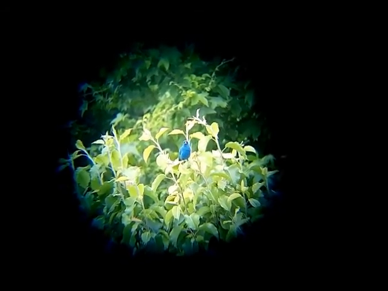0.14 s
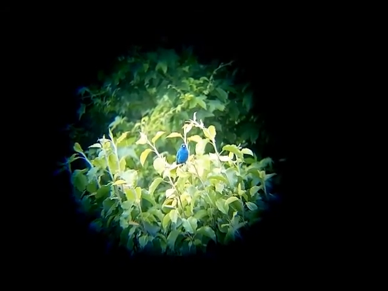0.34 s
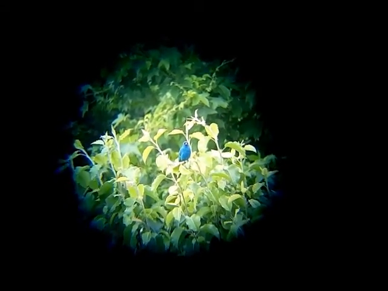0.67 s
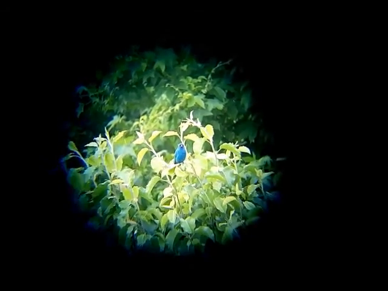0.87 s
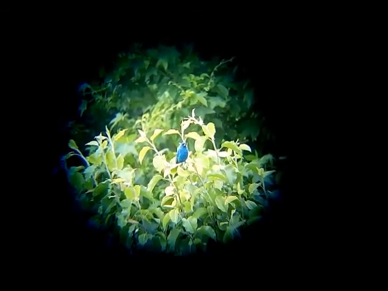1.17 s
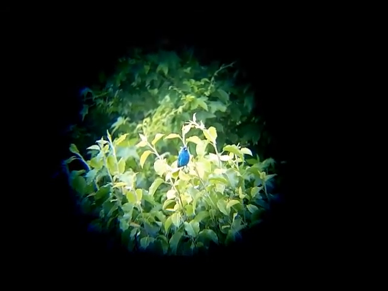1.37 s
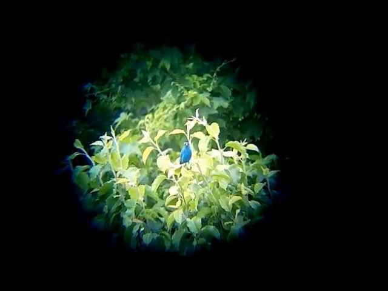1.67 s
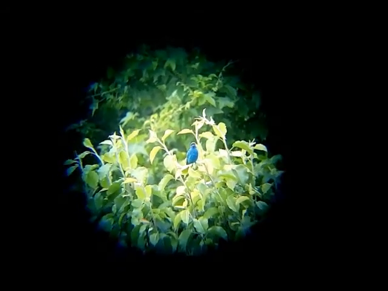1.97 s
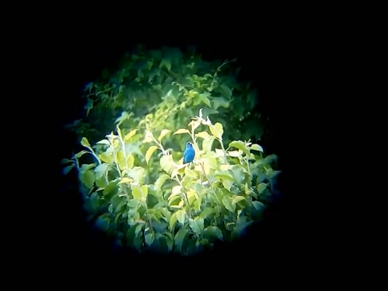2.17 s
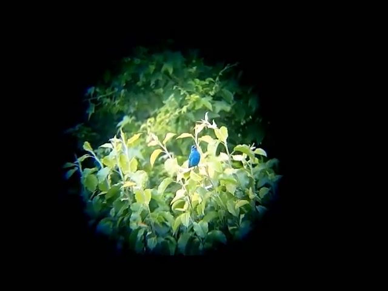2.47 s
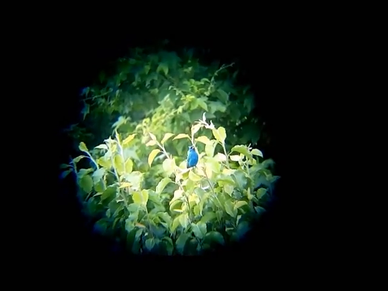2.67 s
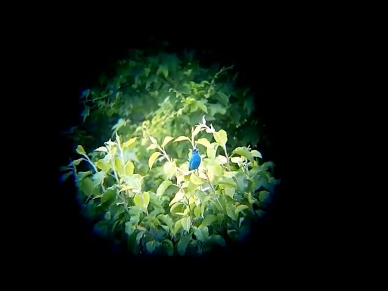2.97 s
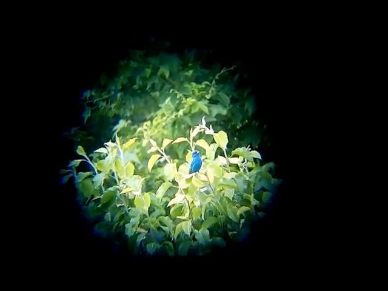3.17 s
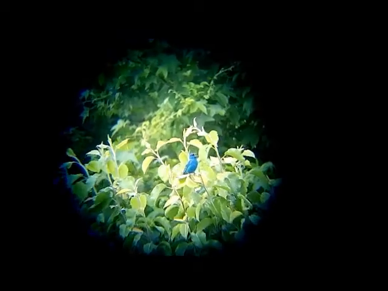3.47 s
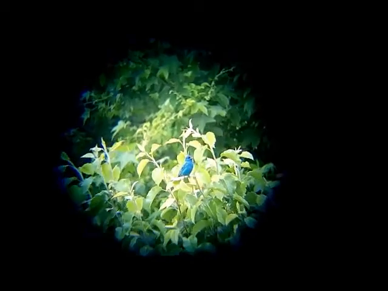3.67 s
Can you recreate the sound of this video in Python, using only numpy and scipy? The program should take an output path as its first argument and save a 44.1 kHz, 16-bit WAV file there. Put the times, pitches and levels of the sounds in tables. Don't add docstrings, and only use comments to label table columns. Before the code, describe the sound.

Wind knocks and rumbles close on the microphone among leafy bushes, swelling in gusts; a faint insect clicks early, then a small bird at right whistles paired gliding notes, with fainter birds farther off.

```python
import sys
import numpy as np
from scipy import signal
from scipy.io import wavfile
from scipy.ndimage import uniform_filter1d

SR = 44100
rng = np.random.default_rng(int(sys.argv[2]) if len(sys.argv) > 2 else 0)


def unload_audio(sound):
    columns = np.transpose(np.atleast_2d(sound))
    steps = np.round(np.clip(columns, -1, 1) * 32767)
    wavfile.write(sys.argv[1], SR, steps.astype(np.int16))


def how_loud(loudness_db):
    steps = np.asarray(loudness_db, float) / 20
    return 10 ** steps


N = 168462

# (time from note start [s], pitch [Hz], level [dB])
SLIDE = [(0, 6150, -5), (.004, 5800, -2), (.006, 5450, -9), (.01, 5250, 1), (.024, 4650, 1),
         (.036, 4050, -2), (.044, 3550, -10)]
PLATEAU = [(0, 4100, -10), (.011, 5450, -4), (.035, 5510, -3), (.055, 5490, 4), (.064, 5450, 2),
           (.069, 5150, -3), (.074, 5500, -3), (.09, 5500, -12)]
SEEP = [(0, 7250, -5.5), (.012, 7160, 3), (.022, 7330, 2), (.028, 7560, -6)]
HUMP = [(0, 3900, -14), (.008, 4234, 0.5), (.016, 4930, 5), (0.022, 5120, -6), (.03, 4750, 3.5),
        (.038, 3820, 0.5), (.044, 3490, -9)]
ARCH = [(-.004, 4950, -22), (.008, 5150, -0.5), (.016, 5800, 5), (.023, 6380, -9), (0.035, 6750, -4),
        (.048, 6560, -16), (.058, 6250, -2.5), (0.071, 5850, -4), (0.087, 5620, -13)]
DROP = [(0, 5590, -4.5), (.005, 5200, 2), (.009, 4550, 5), (.018, 4250, 8), (0.024, 4080, -1.5)]
LIFT = [(0, 3140, -3), (.009, 3660, 3), (.017, 3820, 13), (.026, 4200, 2.5), (.031, 3950, 9),
        (.036, 3480, -10)]
LIFT_END = [(0, 3720, -17), (.007, 4230, -0.5), (.013, 4050, -5.5)]
WHIP = [(0, 4360, -9.5), (.008, 5360, 4.5), (.016, 5900, -2.5), (.027, 6250, -3), (.033, 6350, -14),
        (.039, 6840, -21.5)]
LEVEL = [(0, 5350, -8), (.022, 5370, -5), (.033, 5480, 1), (.044, 5450, -3), (.054, 5300, -10)]
BOW = [(0, 3100, -14), (.012, 3450, -7), (.027, 3830, 2), (.036, 4180, -5), (.046, 4450, 0),
       (.065, 4640, 1), (.083, 4620, 0), (.1, 4340, -4), (.114, 4150, -8)]
SWOOP = [(0, 4850, -10), (0.027, 4400, -1.5), (.055, 3630, -7.5), (.09, 3070, -14)]
SIGH = [(0, 3500, -8), (.035, 3250, -9), (.06, 3150, 1), (.075, 2850, -3), (.095, 2700, 0), (.11, 2600, -8),
        (.14, 2750, -8)]
PEEP = [(0, 6250, -6), (.03, 6280, 0), (.042, 6280, -9), (.1, 6300, -7), (.13, 6250, -10)]
THIN = [(0, 7050, -4), (.02, 7020, 0), (.04, 7000, -4)]
INTRO = [(0, 4000, -12), (.015, 3950, 3), (.033, 3950, -1.5), (.04, 4000, 0.5)]
INTRO_SHORT = [(0, 4120, -2), (.014, 3990, 0), (.022, 3970, -9), (.036, 3950, -8)]


def in_time(rows):
    s, *columns = np.transpose(rows)
    return [np.interp(np.arange(N) / SR, s, c) for c in columns]


def at_hz(points, hz):
    table_hz, value = np.transpose(points)
    return np.interp(np.log(hz), np.log(table_hz), value)


def rms_one(x):
    return x / np.sqrt(np.mean(x ** 2) + 1e-20)


def drift(rate_hz):
    r = np.exp(-80 * np.pi * rate_hz / SR)
    white = rng.standard_normal(N // 40 + 2002)
    slow = signal.lfilter([1], [1, -2 * r, r * r], white)[2000:]
    return np.interp(np.arange(N) / 40, np.arange(len(slow)), rms_one(slow))


def pan(x, db):
    return x * how_loud(np.array([[db / 2], [-db / 2]]))


def butter(x, order, hz, kind):
    return signal.sosfilt(signal.butter(order, hz, kind, fs=SR, output="sos"), x)


def ring(clicks, hz, t60_s):
    r = how_loud(-60 / (t60_s * SR))
    w = 2 * np.pi * hz / SR
    return signal.lfilter([0, np.sin(w)], [1, -2 * r * np.cos(w), r * r], clicks + 1e-18)


def banded_noise(spectrum, shared_db, own_db, shared_rate_hz, own_rate_hz):
    # (frequency [Hz], correlation [-1..1])
    likeness = [(60, .99), (290, .97), (500, .87), (850, .5), (2450, .68), (4160, .26), (7060, -.5)]
    # (frequency [Hz], left minus right [dB])
    tilt = [(80, .5), (170, 1.6), (600, 3.5), (1440, 0), (2450, -4.5), (4160, -6), (7060, -7)]
    octaves = np.log2(spectrum[-1][0] / spectrum[0][0])
    edges_hz = spectrum[0][0] * 2 ** np.arange(0, octaves + .2, 1 / 3)
    together = drift(shared_rate_hz)
    white = rng.standard_normal((2, 2, N + SR))
    out = 0
    for k, (low_hz, high_hz) in enumerate(zip(edges_hz, edges_hz[1:])):
        mid, side = butter(white[k % 2], 2, [low_hz, high_hz], "band")[:, SR:]
        hz = np.sqrt(low_hz * high_hz)
        alike = np.clip(at_hz(likeness, hz), -.999, .999)
        gain = how_loud(at_hz(spectrum, hz) + shared_db * together + own_db * drift(own_rate_hz))
        stereo = np.sqrt(1 + alike) * mid + np.sqrt(1 - alike) * side * [[1], [-1]]
        out = out + pan(gain * stereo, at_hz(tilt, hz))
    return rms_one(out)


def click_steps():
    start_offset, start_fade_s = -.1, .004
    step_s, step_db, step_fade_s = 3.38703, -17, .003
    t = np.arange(N) / SR
    step = how_loud(step_db) * np.sign(t - step_s) / 2 * np.exp(-np.abs(t - step_s) / step_fade_s)
    return pan(step + start_offset * np.exp(-t / start_fade_s), .7)


def wind():
    # (time [s], level [dB])
    gust = [(0, -29), (.3, -30.5), (.75, -27), (1.1, -23), (1.25, -21), (1.6, -18), (1.7, -23),
            (2.0, -23.5), (2.3, -24.5), (2.45, -17.5), (2.51, -29), (2.58, -17.5), (2.74, -29),
            (2.85, -20.5), (3.1, -19), (3.2, -30.5), (3.5, -26), (3.82, -21)]
    # (frequency [Hz], density [dB per Hz])
    wind_spectrum = [(22, -12), (40, -13), (65, 4.5), (110, 5.5), (220, -11), (360, -28), (540, -31),
                     (900, -48.5)]
    # (time [s], level [dB], length [s])
    lulls = [(0.114, -8, 0.031), (0.228, -10, 0.023), (0.656, -7.5, 0.0097), (0.783, -11.5, 0.016),
             (1.069, -12, 0.0091), (1.968, -10, 0.034), (2.244, -11, 0.031), (2.493, -7.5, 0.028),
             (2.743, -10, 0.0093), (3.495, -3.5, 0.048), (3.822, -15.5, 0.011)]
    gust_db, = in_time(gust)
    t = np.arange(N) / SR

    hollow_hz, hollow_width_hz, hollow_db = 106, 10, -1
    r = np.exp(-np.pi * hollow_width_hz / SR)
    w = 2 * np.pi * hollow_hz / SR
    resonator = [0.98, 0.00036, -1, 1, -2 * r * np.cos(w), r * r]
    hollow = rms_one(signal.sosfilt([resonator] * 2, rng.standard_normal(N + SR))[SR:])
    hollow = hollow / np.sqrt(.08 + uniform_filter1d(hollow ** 2, size=900))
    hollow = pan(how_loud(gust_db + hollow_db) * hollow, 0.9)

    lumps_db, gust_follow = -21, 0.2
    lumps = banded_noise(wind_spectrum, shared_db=1.64, own_db=1.0, shared_rate_hz=18.0, own_rate_hz=10)
    lumps = how_loud(lumps_db + gust_follow * (gust_db - gust_db.mean())) * lumps
    sputter_hz, sputter_db, sputter_rate_hz = 210, 2.5, 35
    upper = butter(lumps, 2, sputter_hz, "high")
    lumps = lumps + upper * (how_loud(sputter_db * drift(sputter_rate_hz) - 1.5) - 1)

    lull_db = sum(db * np.exp(-((t - s) / length_s * 2) ** 2) for s, db, length_s in lulls)
    ports = how_loud(lull_db) * (lumps + hollow) + how_loud(-2.5) * knocks() + thumps()
    return butter(ports, 3, 636, "low")


def leaves():
    # (time [s], level [dB])
    rustle = [(0, -63.5), (.85, -59.5), (1.3, -60.5), (1.65, -58.5), (1.95, -61.5), (2.12, -56.5),
              (2.25, -62), (2.47, -64), (2.6, -62), (3.82, -61.5)]
    # (frequency [Hz], density [dB per Hz])
    leaf_spectrum = [(800, -6.5), (1300, 2.5), (2000, 0), (2730, 0.5), (3530, 3.5), (5600, 1.5),
                     (6500, -2.5), (7700, -17)]
    rustle_db, = in_time(rustle)
    hiss = banded_noise(leaf_spectrum, shared_db=0.87, own_db=-0.34, shared_rate_hz=37, own_rate_hz=7.8)
    return how_loud(rustle_db + 3.0) * hiss


def insect():
    # (time [s], peak level [dB])
    insect_level = [(0, -70), (.7, -64), (1.1, -57), (1.2, -64), (1.5, -58), (1.85, -59), (2.0, -70)]
    clicks_per_s, mode_hz, t60_s = 27.5, 6350, .008
    level_db, = in_time(insect_level)
    cycles = np.cumsum(clicks_per_s * (1 + 0.013 * drift(1.8))) / SR
    beat = np.diff(np.floor(cycles), prepend=0)
    return pan(ring(beat * how_loud(level_db + 4 * drift(15)), mode_hz, t60_s), -8)


def thumps():
    # (time [s], peak level [dB])
    eddies = [(0.044, -21), (0.086, -37), (0.28, -46), (0.342, -23.5), (0.467, -31), (0.521, -45),
              (0.654, -21.5), (0.728, -45), (0.758, -23), (0.824, -18.5), (1.023, -22), (1.055, -36.5),
              (1.1, -36), (1.148, -30.5), (1.2, -27), (1.223, -35), (1.568, -23), (1.645, -10.5),
              (1.783, -23.5), (1.916, -27.5), (2.1, -53), (2.157, -26), (2.219, -24), (2.291, -26),
              (2.333, -46), (2.403, -15.5), (2.442, -20.5), (2.454, -11), (2.579, -29), (2.639, -30.5),
              (2.674, -15.5), (2.723, -24.5), (2.948, -22), (2.978, -34), (3.098, -22), (3.22, -24.5),
              (3.323, -41), (3.718, -44), (3.772, -23.5), (3.792, -16)]
    thump_db, thump_hz, top_hz, rise_s = 7.5, 170, 500, 0.0029
    s, db = np.transpose(eddies)
    clicks = np.zeros(N)
    clicks[((s + rise_s) * SR).astype(int)] = how_loud(db + thump_db) * rng.choice([-1, 1], len(s))
    push = ring(clicks, thump_hz, 6.5 / thump_hz)
    return pan(butter(push, 1, top_hz, "low"), 1.8)


def knocks():
    # (time [s], peak level [dB], length [s])
    buffets = [(.36, -39, .08), (1.1, -36, .03), (1.226, -38, .02), (1.65, -31, .012), (2.165, -36, .02),
               (2.45, -27, .035), (2.58, -33, .015), (2.675, -35, .03), (2.725, -32, .012),
               (2.99, -34, .05), (3.33, -30, .015), (3.552, -36, .012), (3.727, -24, .01), (3.8, -29, .02)]
    t = np.arange(N) / SR
    swell = sum(how_loud(db) * np.exp(-((t - s) / length_s * 2) ** 2) for s, db, length_s in buffets)
    puff = butter(rng.standard_normal(N), 2, [120, 300], "band")
    puff = puff / np.sqrt(uniform_filter1d(puff ** 2, size=500))
    return pan(swell * puff, 0.85)


def ticks():
    # (time [s], peak level [dB], pitch [Hz], ring length [cycles], left minus right [dB])
    twigs = [(1.2, -40, 850, 8, 3), (1.224, -33, 800, 5, 3), (1.648, -35, 1100, 3, 3),
             (2.136, -47, 4000, 12, -2), (2.277, -42, 4450, 18, -3), (2.64, -38, 4400, 8, -5),
             (2.674, -29, 750, 5, 3), (2.676, -44, 1800, 6, 2), (2.725, -38, 900, 4, 3),
             (2.801, -40, 2000, 8, 2), (3.728, -40, 1200, 3, 3), (1.569, -37, 600, 5, 3),
             (2.447, -36, 650, 4, 3), (2.96, -37, 600, 5, 3), (2.983, -34, 650, 5, 3),
             (2.04, -47, 5200, 60, -2)]
    out = np.zeros((2, N))
    for s, db, hz, cycles, side_db in twigs:
        click = np.zeros(N)
        click[int(s * SR)] = how_loud(db)
        out += pan(ring(click, hz, cycles / hz), side_db)
    return out


def whistle(shape, start_s, db):
    edge_s = .003
    s, hz, level_db = np.transpose(shape)
    t = np.arange(N) / SR - start_s
    glide_hz = uniform_filter1d(np.interp(t, s, hz), size=130)
    to_edge_s = np.minimum(t - s[0] + edge_s, s[-1] + edge_s - t)
    edge = np.clip(to_edge_s / edge_s, 0, 1) ** 2
    level = np.sqrt(2) * edge * how_loud(db + np.interp(t, s, level_db))
    return level * np.sin(2 * np.pi * np.cumsum(glide_hz) / SR)


def birds():
    # (start [s], level on the right [dB], note shape)
    song = [(2.379, -51, SLIDE), (2.437, -52, PLATEAU), (2.605, -61.5, SEEP), (2.644, -51.5, INTRO),
            (2.678, -47.5, HUMP), (2.812, -60, SEEP), (2.849, -58.5, INTRO_SHORT), (2.882, -42.5, HUMP),
            (3.028, -44.5, ARCH), (3.12, -50, DROP), (3.154, -54.5, LIFT), (3.268, -44, ARCH),
            (3.356, -49, DROP), (3.387, -45, LIFT_END), (3.507, -40.5, WHIP), (3.545, -54, LEVEL),
            (3.645, -50, BOW)]
    # (start [s], level [dB], left minus right [dB], note shape)
    neighbours = [
        (3.657, -54, 1, SWOOP),
        (3.51, -69, -2, SIGH),
        (2.212, -70, -14, PEEP),
        (3.022, -63, -6, THIN),
        (2.585, -70, -12, LEVEL),
    ]
    singer_pan_db, lag_samples = -10, 2
    flutter_db, flutter_rate_hz = 3.2, 90
    singer = sum(whistle(shape, s, db) for s, db, shape in song) * how_loud(singer_pan_db / 2)
    others = sum(pan(whistle(shape, s, db), side_db) for s, db, side_db, shape in neighbours)
    near = pan(singer, singer_pan_db) + others
    near[0] = np.roll(near[0], lag_samples)
    near = near * how_loud(flutter_db * np.array([drift(flutter_rate_hz), drift(flutter_rate_hz)]))

    foliage_db, foliage_t60_s, foliage_gap_s = -13, .9, .006
    t = np.arange(SR // 2) / SR
    tail = rng.standard_normal((2, len(t))) * how_loud(-60 * t / foliage_t60_s) * (t > foliage_gap_s)
    tail = tail / np.sqrt(np.sum(tail ** 2, axis=1)[:, None])
    scattered = signal.fftconvolve(near[1:], tail, axes=1)[:, :N]
    return near + pan(how_loud(foliage_db) * scattered, -6.5)


def scene():
    return wind() + leaves() + insect() + ticks() + birds()


def roll_off(x):
    return signal.sosfilt(signal.butter(12, 16000, fs=SR, output="sos"), x)


def record(dry):
    ceiling, cutoff_hz = .75, 8350
    rounded = ceiling * np.tanh(dry / ceiling)
    cut = signal.sosfilt(signal.cheby2(24, 60, cutoff_hz, fs=SR, output="sos"), rounded)
    return roll_off(cut + click_steps())


dry = scene()
out = record(dry)
unload_audio(out)
```